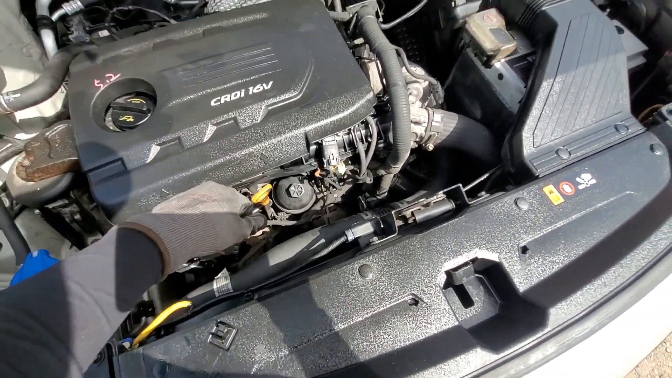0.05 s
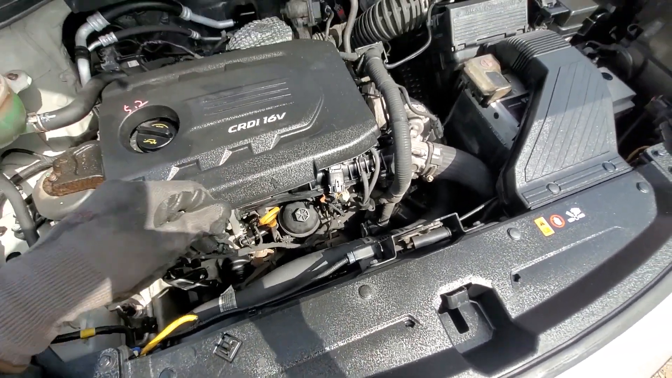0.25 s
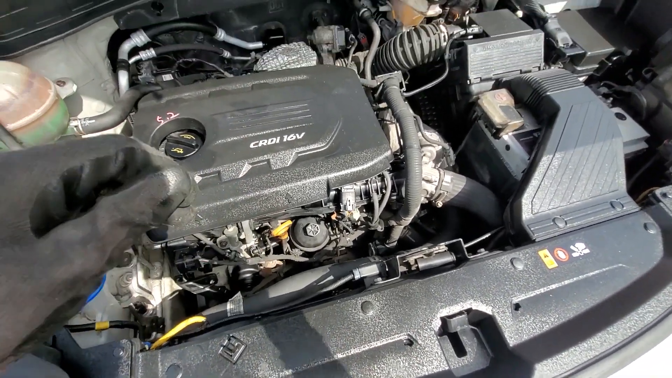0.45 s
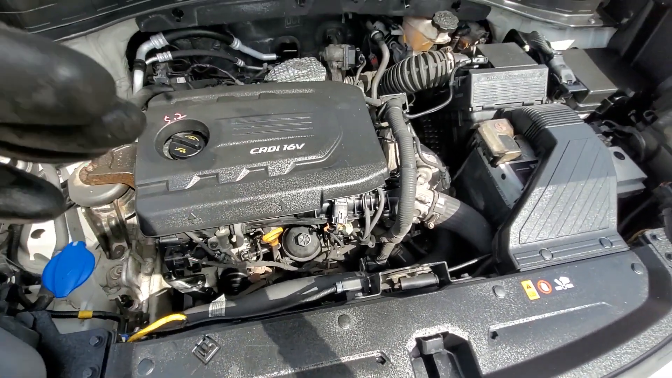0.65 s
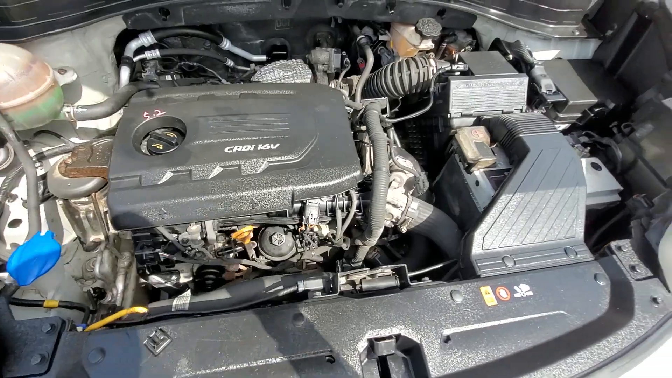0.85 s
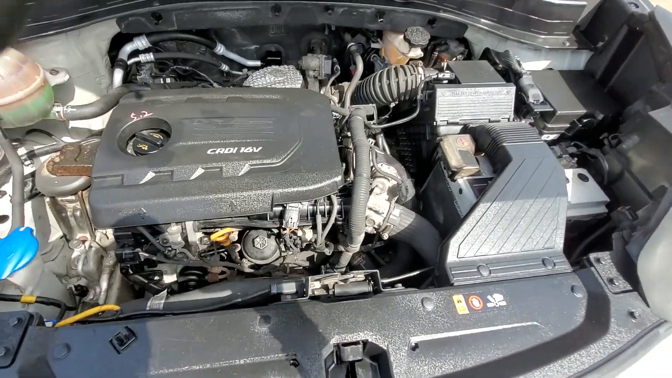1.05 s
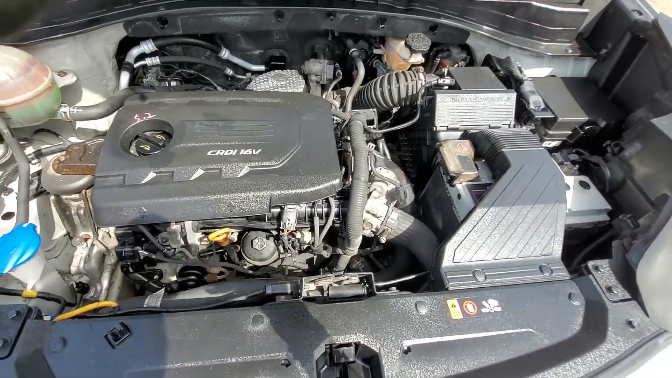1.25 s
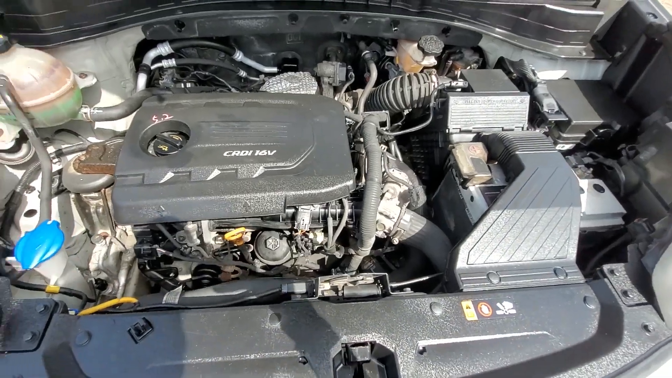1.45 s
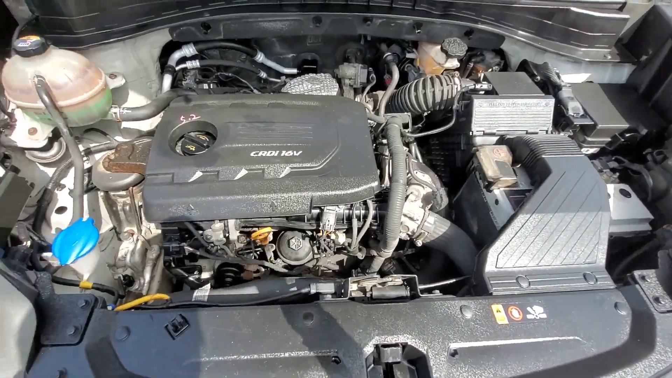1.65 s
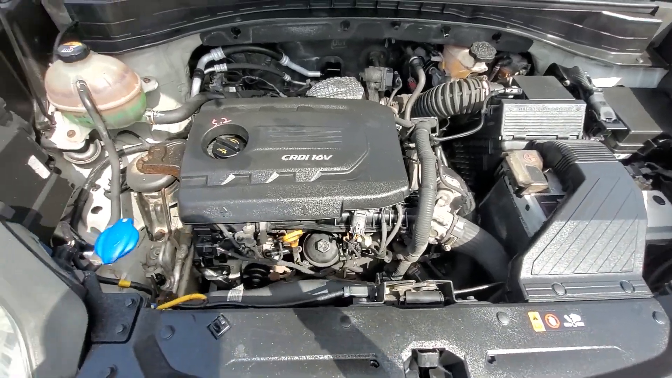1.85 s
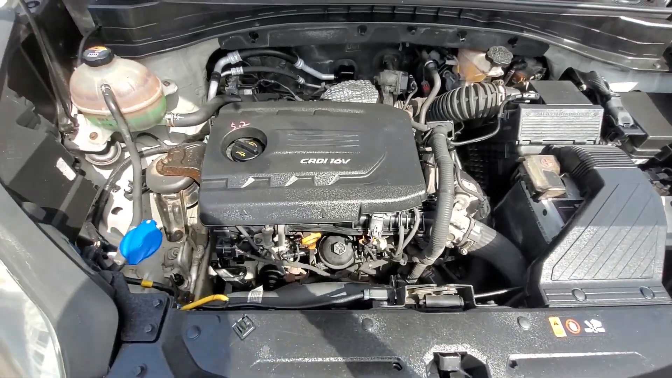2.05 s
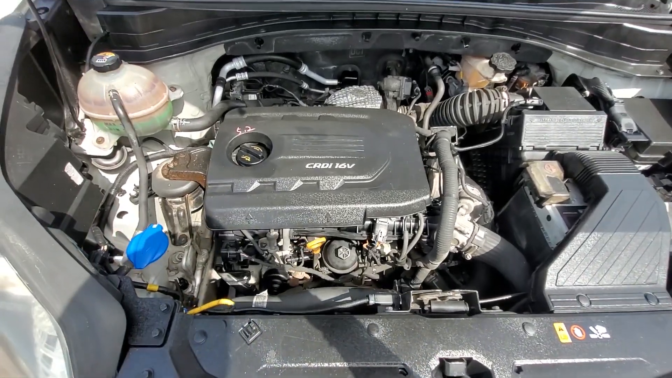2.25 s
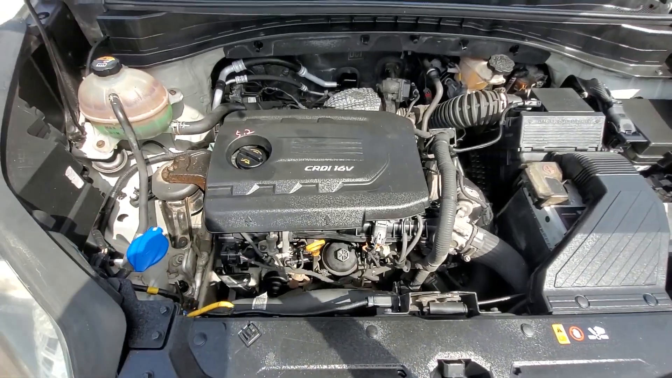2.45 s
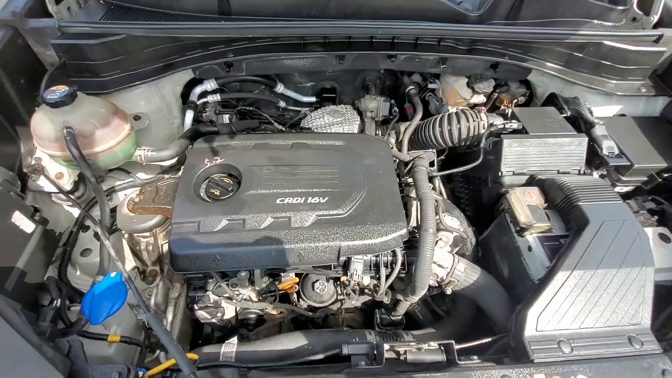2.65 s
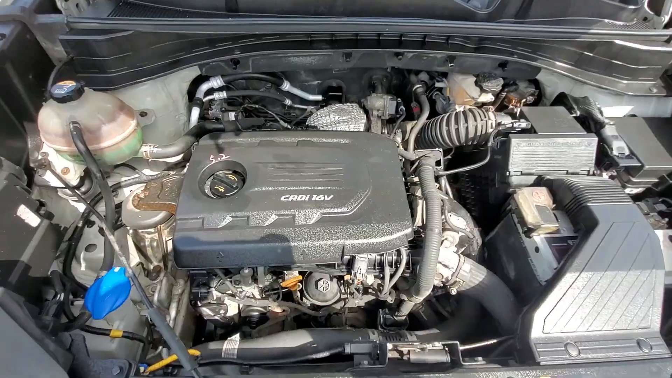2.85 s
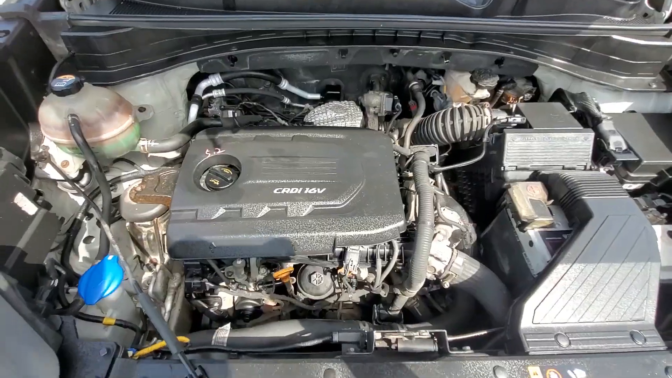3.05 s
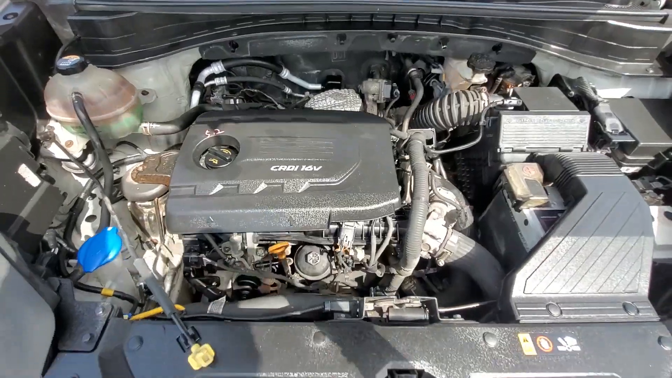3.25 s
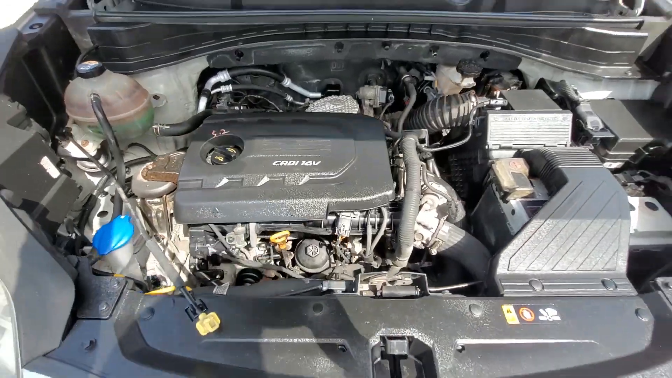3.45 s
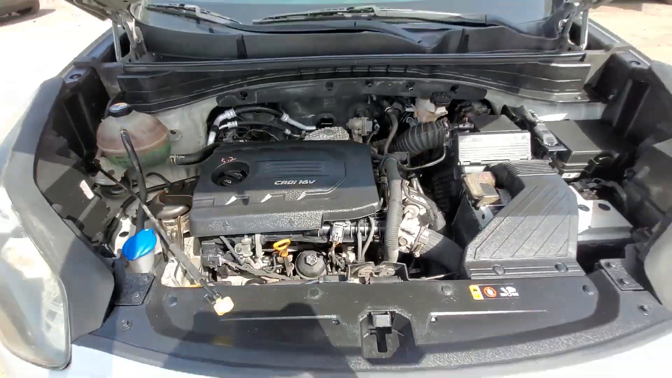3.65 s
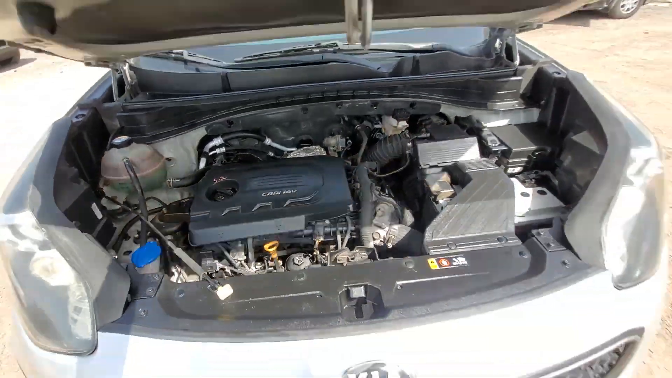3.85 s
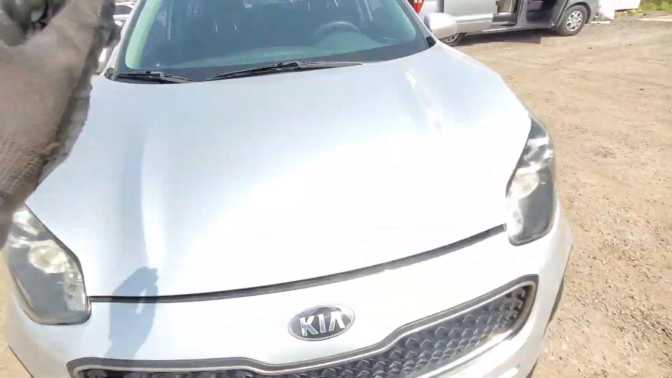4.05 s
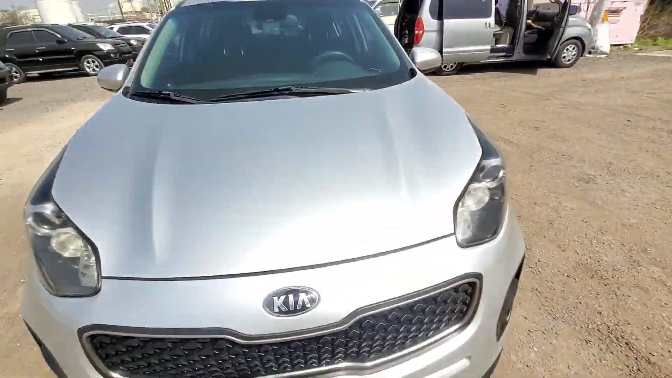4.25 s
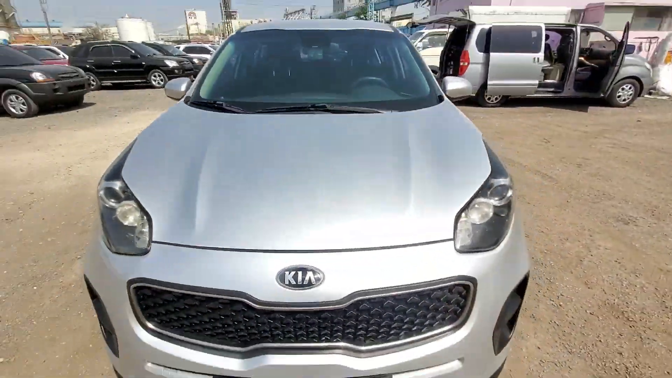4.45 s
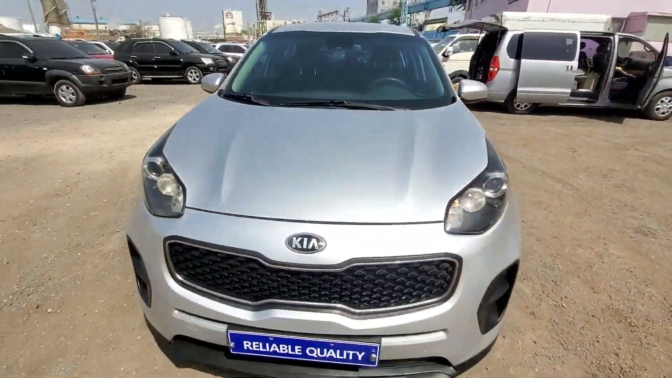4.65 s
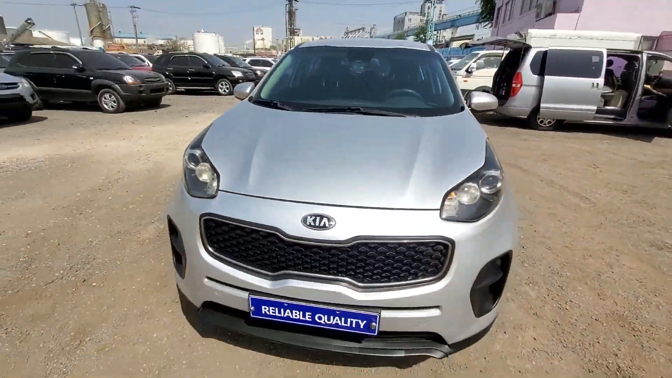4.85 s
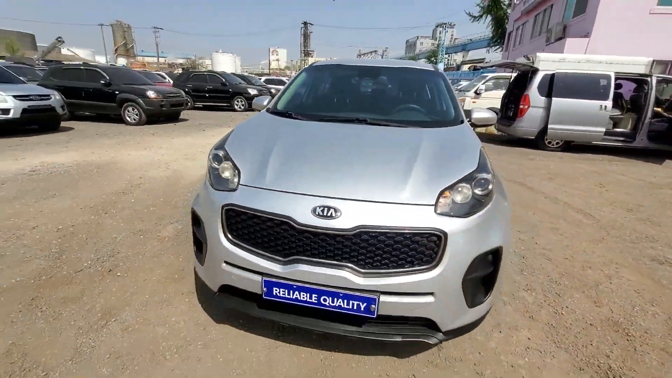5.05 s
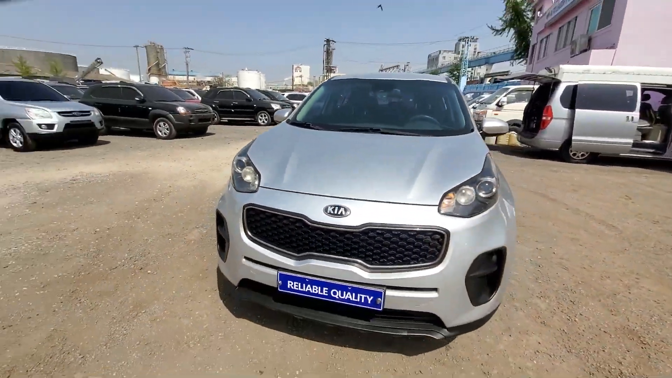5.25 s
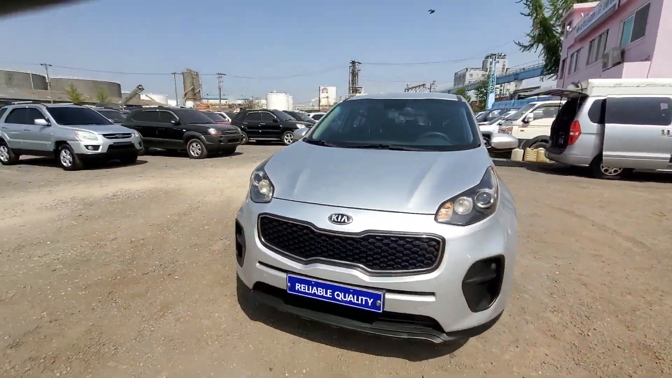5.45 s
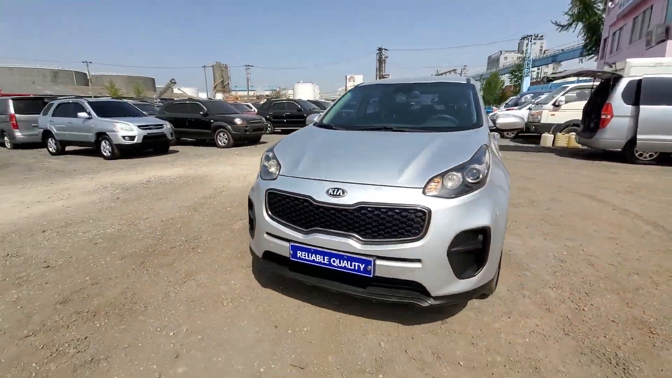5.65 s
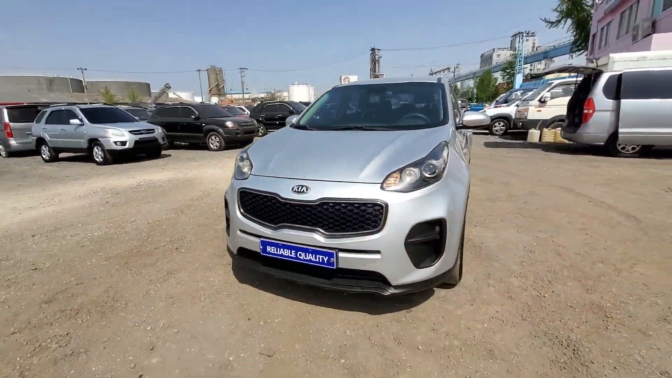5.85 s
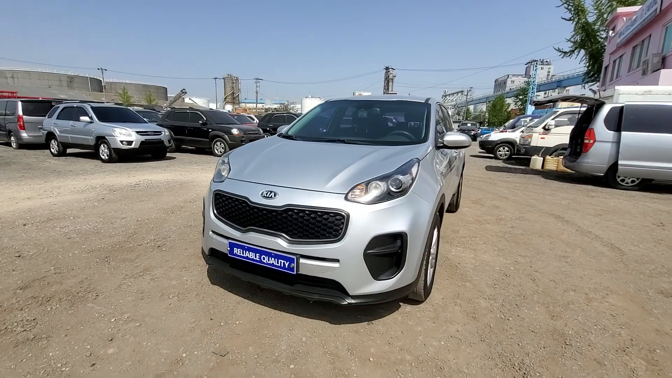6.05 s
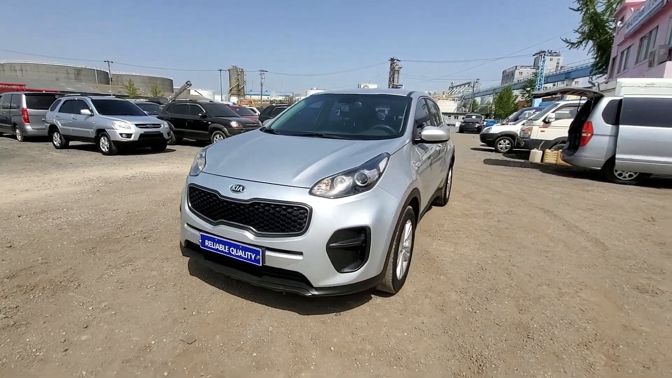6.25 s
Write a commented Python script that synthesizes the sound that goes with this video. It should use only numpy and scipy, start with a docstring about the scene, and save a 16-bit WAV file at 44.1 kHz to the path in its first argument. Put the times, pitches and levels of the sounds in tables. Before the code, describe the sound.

Outdoors, a handheld microphone hangs over an open engine bay: steady, rapid diesel knock, injector ticks, chain rattle and low throb. After three seconds it grows more distant and windy. A sharp, heavy bonnet slam follows at about four seconds. The whole sound sinks sharply, leaving muffled idling, then recovers, with stone snaps, gravel scuffs and low wind thuds, mostly on the right.

```python
"""A four-cylinder turbo-diesel idles in an open yard, heard from just above the engine bay.
Each firing gives a low throb (summed sines), a knock (sines of wandering pitch) and injector ticks (noise bursts),
over valve and chain clatter (repeating noise). The bonnet slams: struck panel tones, a latch crack and a boom.
The level sinks and swells back. Steps scrape and snap gravel (short noises), and wind buffets the
two microphone ports (low noise and single swings of pressure), with a faint wash of noise from the yard."""
import sys
import numpy as np
from scipy import signal
from scipy.fft import rfft, irfft, next_fast_len
from scipy.io import wavfile
from scipy.ndimage import uniform_filter1d

SR = 44100
rng = np.random.default_rng(int(sys.argv[2]) if len(sys.argv) > 2 else 0)


def materialize(psi):
    """Save the field psi as 16-bit PCM at rate SR to the path in sys.argv[1].

    A 1-D psi becomes a single channel; in a 2-D psi each row is a channel.
    """
    bounded = np.clip(np.atleast_2d(psi).T, -1, 1)
    quanta = np.round(bounded * 32767).astype(np.int16)
    wavfile.write(sys.argv[1], SR, quanta)


N = 278263
TIME = np.arange(N) / SR
FIRINGS_PER_S = 26.35  # idle speed before it settles
# the listener straightens up and backs off
BACK_OFF_S, BACK_OFF_TAKES_S = 3.155, 0.8


# how the engine differs between the ports: (frequency [Hz], left minus right [dB])
PORT_BALANCE = [(60, -2.5), (400, -2.5), (700, -3), (1400, 0.5), (2100, 0.5), (2800, 0.5), (4400, -9),
                (6300, -10.5), (9800, -2.5), (13000, -14.5), (16000, -12)]
# loss when the engine is fully hidden: (frequency [Hz], level [dB])
SCREEN_LOSS = [(75, -5.5), (130, -13), (175, -22), (240, -9.5), (340, -17.5), (450, -16), (700, -20.5),
               (1100, -17), (1700, -15), (2400, -16.5), (3000, -20.5), (3900, -21.5), (6000, -27),
               (9000, -20.5), (14000, -35.5)]


def engine(direct_loss_db=-5.0, lean_db=3.5, lean_s=1.4, port_lag_s=0.00014):
    """All engine sounds, duller and fainter as bodywork comes between; they reach the right port later."""
    crank, cover = crank_turn(), screening()
    turns = np.maximum.accumulate(crank)
    fired = np.interp(np.arange(int(crank[-1]) + 1), turns, TIME, left=-1)  # firing times [s]

    # these need a line of sight, so cover costs them extra
    sharp = knock(fired) + injectors(fired) + tappets(fired) + hum(crank)
    sharp = sharp * from_db(direct_loss_db * cover)
    # at first the listener leans low over the casings, so the clatter is louder
    lean = from_db(lean_db * (1 - ramp(0, lean_s)))
    pulsing = stroke(crank) * (lean * valve_train(crank) + rush() + hollow())
    bay = sharp + throb(crank) + pulsing

    # half the balance goes to each side
    left = shaped(bay[0], [(hz, db / 2) for hz, db in PORT_BALANCE])
    right = shaped(bay[1], [(hz, -db / 2) for hz, db in PORT_BALANCE])
    bay = np.array([left, np.interp(TIME - port_lag_s, TIME, right)])

    # blend between four fixed amounts of screening
    steps = np.linspace(0, 1, 4)
    out = np.zeros((2, N))
    for step in steps:
        share = np.interp(cover, steps, steps == step)
        out += share * shaped(bay, [(hz, step * db) for hz, db in SCREEN_LOSS])
    return out


# the beat jumps back once: (time [s], jump back [firings])
BEAT_JUMP = (2.97, .53)
# the idle settles lower: (from time [s], speed drop [firings per s])
IDLE_SETTLES = (3.4, .105)


def crank_turn(start_phase=0.72):
    """Place in the beat, in firings: a steady count that jumps back at one moment, later a bit slower."""
    jump_s, jump_back = BEAT_JUMP
    settle_s, slower = IDLE_SETTLES
    steady = start_phase + FIRINGS_PER_S * TIME
    return steady - jump_back * (TIME > jump_s) - slower * np.maximum(TIME - settle_s, 0)


# low tones of the firing pulse: (multiple of the firing rate, level [dB rms])
THROB_TONES = [(1.5, -51), (2, -35.5), (2.5, -45), (3, -25.5), (4, -30.3), (4.5, -47), (5, -42), (6, -45)]


def throb(crank, waver_db=0.15, top_hz=400, lag=0.72):
    """Firing pushes out low tones; those at whole multiples dip together, lag beats after each firing."""
    pulse = np.zeros(N)
    for multiple, db in THROB_TONES:
        level = from_db(db + waver_db * drift(12.0))
        pulse -= np.sqrt(2) * level * np.cos(2 * np.pi * multiple * (crank - lag))
    return signal.sosfiltfilt(signal.butter(2, top_hz, fs=SR, output="sos"), pulse)


# ring of the block and fuel lines:
# (frequency [Hz], width [Hz], relative level for cylinders 1, 2, 3 and 4 [dB each])
KNOCK_RINGS = [(1240, 45, -32, -28, -27, -30), (1480, 35, -24.5, -20, -18, -18),
               (1680, 55, -25, -26, -24, -21.5), (1900, 45, -24.5, -23.5, -27.5, -22),
               (2080, 45, -27, -20, -28, -26), (2300, 70, -27, -29, -32, -28),
               (3500, 130, -37, -40, -32, -37), (4750, 180, -35, -32, -29, -28),
               (6230, 85, -31, -24, -26, -27), (6700, 400, -35, -30, -30, -31),
               (9000, 1800, -50, -46, -39, -37), (14250, 200, -39, -41, -36, -33),
               (15200, 700, -37, -39, -34, -32)]


def knock(fired, delay=0.0014, uneven_db=1.14, level_db=-4.5, fresh=0.56, mode_swing_db=1.33,
          t60_s=0.052, rise_s=0.0007):
    """Each combustion rings the block briefly; each cylinder's own ring comes back nearly alike."""
    count = len(fired)
    cylinder = np.arange(count) % 4
    force_db = level_db + uneven_db * rng.standard_normal(count)
    soft = np.exp(-1 / (rise_s * SR))
    # for every sample: which knock came last, and how many samples ago
    starts = np.maximum(np.round((fired + delay) * SR).astype(int), 0)
    latest = np.maximum(np.searchsorted(starts, np.arange(N), "right") - 1, 0)
    age = np.minimum(np.arange(N) - starts[latest], 2047)

    out = np.zeros((2, N))
    for hz, width, *by_cylinder in KNOCK_RINGS:
        swing_db = mode_swing_db * rng.standard_normal(count)
        strength = from_db(np.array(by_cylinder)[cylinder] + force_db + swing_db)
        decay = dying(clicks(fired + delay, strength), t60_s)
        envelope = signal.lfilter([1 - soft], [1, -soft], decay)
        # a cluster of close modes: the phase wanders, mostly along the cylinder's own path
        own_steps = rng.standard_normal((2, 4, 2048))[:, cylinder]
        steps = own_steps + fresh * rng.standard_normal((2, count, 2048))
        smooth_steps = signal.lfilter([.05], [1, -.95], steps)
        wander = np.cumsum(smooth_steps, axis=2) * np.sqrt(2 * np.pi * width / SR)
        wander += rng.uniform(0, 2 * np.pi, (2, 4, 1))[:, cylinder]
        phase = 2 * np.pi * hz * age / SR + wander[:, latest, age]
        out += np.sqrt(2) * envelope * np.sin(phase)
    return out


# colour of an injector tick: (frequency [Hz], level [dB per Hz])
TICK_COLOUR = [(500, 53), (1500, -51), (2800, 4), (4500, 2), (6500, -12), (9500, -11), (12500, -13.5),
               (15500, -22.5)]
# loudness of the injectors of cylinders 1, 2, 3 and 4: (level [dB] each)
INJECTOR_LEVELS = [1, -3.5, 0, 1.5]


def injectors(fired, level_db=-33.5, main_delay=0.003, pilot_db=-2, t60=0.094, uneven_db=-0.5):
    """A pilot and a main injection tick on every firing, each a dying burst of noise."""
    own_db = np.resize(INJECTOR_LEVELS, len(fired))[:, None]
    strength = from_db(own_db + uneven_db * rng.uniform(-0.78, 1, (len(fired), 2)))
    pilot = clicks(fired, strength[:, 0] * from_db(pilot_db))
    main = clicks(fired + main_delay, strength[:, 1])
    return from_db(level_db) * rms_one(dying(pilot + main, t60) * noise(TICK_COLOUR))


# ring of the casings under valve and gear contacts: (frequency [Hz], level [dB per Hz])
CASING_COLOUR = [(100, 6), (180, 0.5), (245, -2), (290, -3), (340, 0.5), (400, -7.5), (450, -7.5), (500, 5),
                 (570, -12), (660, 0), (730, -14), (830, 3.5), (1150, -3), (2000, -7), (3000, -10.5),
                 (6000, -22), (10000, -31)]


def valve_train(crank, level_db=-30, rough=0.45):
    """Cams, gears and chain repeat the same dense contacts every four firings, never quite as hard."""
    size = round(4 * SR / FIRINGS_PER_S)
    cycle = rng.standard_normal((2, size))
    place = (crank % 4 / 4 * size).astype(int) % size
    contacts = cycle[:, place] * (1 + rough * drift(150))
    return from_db(level_db) * rms_one(shaped(two_ports(contacts), CASING_COLOUR))


# ring of the tappets: (frequency [Hz], relative level [dB])
TAPPET_RINGS = [(3480, 2.5), (4010, 1), (4850, -7), (5900, 3.5), (7900, -2)]


def tappets(fired, level_db=-39, t60=.024, uneven_db=7.0):
    """Valves seat with small uneven metallic ticks between the knocks."""
    chance = rng.uniform(-1, 1, (len(fired), 2))
    # two seatings a firing, at about 0.4 and 0.62 of the way to the next
    seats = (fired[:, None] + (np.array([.4, .62]) + .05 * chance) / FIRINGS_PER_S).ravel()
    shape = (2, len(TAPPET_RINGS), len(seats))
    strength = rng.choice([-1, 1], shape) * from_db(uneven_db * rng.uniform(-2.8, 1, shape))
    sides = np.zeros((2, N))
    for side in range(2):
        for (hz, db), gains in zip(TAPPET_RINGS, strength[side]):
            sides[side] += from_db(db) * ring(clicks(seats, gains), hz, t60)
    return from_db(level_db) * rms_one(sides)


# rush of belts, chain and air: (frequency [Hz], level [dB per Hz])
RUSH_COLOUR = [(22, -36), (40, -6), (60, -2.5), (110, 1), (170, -8.5), (260, -2), (350, -7.5), (560, -9),
               (1000, -9), (1500, -10.5), (2300, -10.5), (2900, -15), (6300, -19), (9500, -31),
               (13000, -28.5)]


def rush(level_db=-25.0, flutter_db=2.0):
    """Belts, chain and intake air make a broad, fluttering rush of noise."""
    return bay_echoes(from_db(level_db + flutter_db * drift(250)) * noise(RUSH_COLOUR))


def bay_echoes(x, echo_db=-16, low_hz=1200):
    """Nearby panels and pipes throw the treble back within milliseconds and ripple its spectrum."""
    treble = filtered(x, 2, "high", low_hz)
    lags = (rng.uniform(.002, .008, 4) * SR).astype(int)
    echoes = sum((-1) ** k * np.roll(treble, lag, axis=1) for k, lag in enumerate(lags))
    return x + from_db(echo_db) * echoes


# steady hum of the drive train: (multiple of the firing rate, level [dB rms])
HUM_TONES = [(5.5, -48), (6, -48), (7.5, -45), (9.25, -41), (9.5, -46), (11, -43), (15, -39), (17, -47),
             (19, -44.5), (21, -48), (31.5, -49), (152.1, -56)]


def hum(crank, waver_db=2.5, wobble=0.54):
    """Pulleys, pump and alternator sing at fixed multiples of the crank's speed."""
    out = np.zeros(N)
    for multiple, db in HUM_TONES:
        level = from_db(db + waver_db * drift(12))
        out += np.sqrt(2) * level * np.sin(2 * np.pi * multiple * crank + wobble * drift(5.7))
    return out


# colour of the air in the engine bay: (frequency [Hz], level [dB per Hz])
HOLLOW_COLOUR = [(120, -57), (215, 11), (300, 6.5), (520, -5.5), (660, 8.5), (800, 2), (1500, -27)]


def hollow(start_s=2.87, takes_s=0.11, near_db=-40.5, far_db=-28):
    """The bay's air booms in broad resonances, more once the listener is no longer bent over it."""
    return from_db(near_db + (far_db - near_db) * ramp(start_s, takes_s)) * noise(HOLLOW_COLOUR)


def stroke(crank, depth_db=1, crest=0.29):
    """Gain that swells with each power stroke; the crest is a share of a firing."""
    return from_db(depth_db * np.cos(2 * np.pi * (crank - crest)))


def screening(rim_cover=0.29, drop_s=3.997, drop_takes_s=0.24,
              grille_s=4.27, grille_takes_s=0.69, grille_share=0.35):
    """Share of the engine hidden by the bay's rim, then the falling bonnet, less what the grille lets out."""
    rim = rim_cover * ramp(BACK_OFF_S, BACK_OFF_TAKES_S)
    bonnet = (1 - rim_cover) * ramp(drop_s, drop_takes_s)
    return np.clip(rim + bonnet - grille_share * ramp(grille_s, grille_takes_s), 0, 1)


# bonnet strikes the latch, then drives it home: (time [s], panel level [dB], latch crack level [dB])
LATCH_BLOWS = [(4.1214, 0, -13), (4.1279, -2, -37)]
# bonnet bounces on its rubber stops: (time [s], panel level [dB], clack level [dB])
STOP_BUMPS = [(4.164, -11.5, -15.5), (4.181, -12.5, -18.5), (4.205, -10, -37)]
# tones of the panel: (frequency [Hz], level when struck at the latch [dB],
# level when struck at the stops [dB], time to die away by 60 dB [s])
PANEL_TONES = [(106, -21, -16, 0.42), (247, -17, -12.5, 0.74), (277, -3, -15, 0.059), (327, -21, -14, 0.42),
               (486, -30, -28, 0.17), (635, -27, -13, 0.2), (763, -35, -13.5, 0.26), (910, -36, -26, 0.21),
               (1020, -37, -27, 0.34), (1150, -27, -30, .08), (1300, -36, -24, 0.16), (1605, -25, -32, 0.1),
               (2100, -40, -38, 0.17)]
# dense shudder of the sheet metal: (frequency [Hz], level [dB per Hz])
SHUDDER_COLOUR = [(25, -28), (60, -12), (130, -2), (280, 8.5), (450, 0), (700, -2), (1200, -11.5),
                  (1800, -34), (3000, -45), (9000, -64)]
# crack of the latch: (frequency [Hz], level [dB per Hz])
CRACK_COLOUR = [(200, 11.5), (900, 9.5), (2500, -4.5), (4200, -6.5), (7000, -7.5), (10000, -16.5),
                (15000, -8)]


def slam(crack_t60=0.088, stop_top_hz=2600, shudder_db=-20, shudder_t60=1.0, panel_db=-2,
         boom_db=-7.5, boom_hz=62, boom_t60=0.35, latch_db=-11, low_hz=35):
    """The latch cracks and pings, the panel thuds and shudders, then clangs on its stops with a boom."""
    blow_s, blow_db, crack_db = np.transpose(LATCH_BLOWS)
    stop_s, stop_db, clack_db = np.transpose(STOP_BUMPS)
    blows, bumps = clicks(blow_s, from_db(blow_db)), clicks(stop_s, from_db(stop_db))

    panel = np.zeros(N)
    for hz, front_db, edge_db, t60 in PANEL_TONES:
        panel += ring(from_db(front_db) * blows + from_db(edge_db) * bumps, hz, t60)
    panel *= from_db(panel_db)
    latch = from_db(latch_db) * ring(clicks(blow_s[:1], [1.0]), hz=4100, t60=0.0091)
    boom = from_db(boom_db) * ring(clicks([4.1445], [1.0]), boom_hz, boom_t60)

    # the hits add as energy, which dies in half the time
    energy = dying(blows ** 2 + bumps ** 2, shudder_t60 / 2)
    shudder = from_db(shudder_db) * np.sqrt(energy) * noise(SHUDDER_COLOUR)
    grit = noise(CRACK_COLOUR)
    crack = dying(clicks(blow_s, from_db(crack_db)), crack_t60) * grit
    clacks = dying(clicks(stop_s, from_db(clack_db)), crack_t60) * grit
    clacks = filtered(clacks, 2, "low", stop_top_hz)
    radiated = filtered(panel + latch + boom + shudder + crack + clacks, 2, "high", low_hz)
    return radiated * from_db([[-1.5], [1.0]])


# shoes scuffing gravel: (time [s], level [dB], half-length [s])
SHOE_SCUFFS = [(5.066, -35.5, 0.056), (5.24, -31.5, 0.044), (5.911, -31.5, 0.018), (6.264, -40, 0.0093)]
# colour of the gravel: (frequency [Hz], level [dB per Hz])
GRAVEL_COLOUR = [(800, -4), (2900, 1.5), (3900, 6.5), (4800, 0), (7500, -1), (10000, -16), (13000, -4),
                 (16000, -15)]
# small stones snapping underfoot: (time [s], level [dB])
STONE_SNAPS = [(4.741, -29), (5.002, -14), (5.0318, -17)]
# one stone squeaks: (time [s], level [dB], half-length [s], frequency [Hz])
STONE_SQUEAK = (5.92, -28, 0.02, 4016)
# a heel crunching into the dirt: (time [s], level [dB], half-length [s])
HEEL_CRUNCHES = [(6.126, -27.5, 0.018), (6.179, -25, 0.0077)]
# colour of the dirt: (frequency [Hz], level [dB per Hz])
DIRT_COLOUR = [(200, -17), (600, 1), (1400, -4), (2500, -14), (6000, -45)]


def footsteps(grain_db=2.5, left_db=-11, snap_t60=0.0095):
    """Soles grind and snap small stones, one of which squeaks; the heel gives a duller crunch."""
    grains = rms_one(from_db(grain_db * drift(700)))
    scuffs = grains * sum(swell(*row) for row in SHOE_SCUFFS) * noise(GRAVEL_COLOUR)
    *squeak_shape, squeak_hz = STONE_SQUEAK
    squeak = swell(*squeak_shape) * np.sin(2 * np.pi * squeak_hz * TIME)
    snap_s, snap_db = np.transpose(STONE_SNAPS)
    soft_noise = signal.lfilter([.5], [1, -.5], rng.standard_normal((2, N)))
    snaps = dying(clicks(snap_s, from_db(snap_db)), snap_t60) * soft_noise
    crunches = grains * sum(swell(*row) for row in HEEL_CRUNCHES) * noise(DIRT_COLOUR)
    return (scuffs + squeak + snaps) * from_db([[left_db], [0]]) + crunches


# strong buffets: (time [s], level [dB], half-length [s], top frequency [Hz])
WIND_GUSTS = [(1.279, -14.5, 0.023, 400), (3.415, -14, 0.013, 355), (3.757, -16.5, 0.013, 240),
              (3.977, -21, 0.039, 300), (4.39, -17.5, 0.089, 190), (4.626, -19.5, 0.017, 330),
              (4.774, -16.5, 0.041, 230), (5.364, -14.5, 0.0078, 250), (5.525, -16.5, 0.034, 230),
              (5.865, -20.5, 0.04, 202), (6.165, -15, 0.04, 171), (6.24, -18, 0.018, 200)]
# single eddies popping on the port: (time [s], strength [dB], half-length [s])
WIND_POPS = [(1.273, -6, 0.0012), (1.289, -14, 0.0015), (1.506, -3, 0.002), (3.42, 1.5, 0.0011),
             (3.4625, -8, .0011), (3.472, -2, .0022), (3.744, -12, .0016), (3.752, -2.5, 0.0018),
             (3.944, -5, 0.0019), (3.955, -6, 0.0014), (3.99, -4, .001), (3.995, -8, 0.00075),
             (4.6053, -5, 0.0011), (4.629, -5, 0.00086), (4.7435, -9, 0.00059), (4.7952, 0, 0.00069),
             (5.507, -4.5, 0.0011), (5.547, 1, .0021), (5.574, -7.5, 0.002), (5.761, -6.5, 0.0041),
             (5.813, -10, 0.0017), (5.862, -9, 0.0017), (6.143, -4.5, 0.0013), (6.161, -2, 0.0019),
             (6.238, 1, 0.0011), (6.26, -7, 0.0018), (6.293, -4, 0.002)]


def wind(left_db=-20, low_hz=70, eddy_db=-39, eddy_swing_db=11.5, eddies_per_s=6.2):
    """Eddies burst mostly on the right port; some pop with one swing of pressure, down then up."""
    air = filtered(rng.standard_normal((2, N)), 2, "high", low_hz)
    # small eddies come at random while walking
    level_db = eddy_db + eddy_swing_db * np.minimum(drift(eddies_per_s), 2)
    out = ramp(BACK_OFF_S, BACK_OFF_TAKES_S) * from_db(level_db) * rumble(air, top_hz=190)
    for s, db, half, top_hz in WIND_GUSTS:
        near = np.abs(TIME - s) < .25
        out[:, near] += swell(s, db, half)[near] * rumble(air[:, near], top_hz)
    for s, db, half in WIND_POPS:
        near = np.abs(TIME - s) < .05
        u = (TIME[near] - s) / half
        out[:, near] += from_db(db) * 2 * u / (1 + u ** 2) ** 2
    return out * from_db([[left_db], [0]])


def rumble(air, top_hz):
    """Noise with its treble removed, evened out to about rms 1."""
    low = filtered(air, 3, "low", top_hz)
    return low / np.sqrt(uniform_filter1d(low ** 2, size=1500) + 1e-12)


# colour of the moving air: (frequency [Hz], level [dB per Hz])
BREEZE_COLOUR = [(18, -35), (35, -21), (58, 7), (90, -11), (130, -6), (220, -25), (600, -89)]


def breeze(swing_db=2.5, left_db=-5, standing_db=-30, walking_db=-25):
    """Moving air rumbles on each port by itself, more on the right and more when walking."""
    walking = ramp(BACK_OFF_S, BACK_OFF_TAKES_S)
    level_db = standing_db + (walking_db - standing_db) * walking + swing_db * drift(3.93)
    air = rms_one(shaped(rng.standard_normal((2, N)), BREEZE_COLOUR))
    return air * from_db(level_db) * from_db([[left_db], [1]])


# diffuse wash of the yard: (frequency [Hz], level [dB per Hz])
YARD_COLOUR = [(25, -4), (55, 28.5), (120, 3), (250, -10), (450, -3), (1100, -28), (2000, -22), (2400, 12),
               (2800, -42), (3900, -30), (7500, -47), (10000, -92), (16000, -28)]


def yard(level_db=-44):
    """The open yard adds a faint, steady wash of coloured noise."""
    return from_db(level_db) * noise(YARD_COLOUR)


def sinking(sink_s=4.147, takes_s=0.19, sink_db=-15, sag_db_per_s=-5.0,
            recover_s=5.346, recover_time_s=0.25):
    """Gain of the whole sound: it sinks after the slam, sags for about a second and swells back."""
    sag_db = sag_db_per_s * (np.clip(TIME, sink_s, recover_s) - sink_s)
    held_db = sink_db * ramp(sink_s, takes_s) + sag_db
    return from_db(held_db * np.exp(-np.maximum(TIME - recover_s, 0) / recover_time_s))


def from_db(db):
    """Decibels to gain."""
    return 10 ** (np.asarray(db) / 20)


def rms_one(x):
    """Scale to unit rms (average strength)."""
    return x / np.sqrt(np.mean(x ** 2) + 1e-20)


def filtered(x, order, kind, hz):
    """Keep only what lies below ("low") or above ("high") a frequency."""
    return signal.sosfilt(signal.butter(order, hz, kind, fs=SR, output="sos"), x)


def shaped(x, spectrum):
    """Colour a signal by a table of (frequency [Hz], level [dB]), read on a log-frequency axis."""
    size = next_fast_len(N + 4096)
    hz = np.maximum(np.arange(size // 2 + 1) * SR / size, 1)
    table_hz, table_db = np.transpose(spectrum)
    gain = from_db(np.interp(np.log(hz), np.log(table_hz), table_db))
    return irfft(rfft(x, size) * gain, size)[..., :N]


# how alike left and right are: (frequency [Hz], likeness from 0 to 1)
PORT_LIKENESS = [(40, 0.039), (120, 1), (300, 0.95), (600, 0.92), (1100, 0.31), (16000, 0.025)]


def two_ports(pair):
    """Mix two unrelated signals into left and right, most alike from about 100 to 600 Hz."""
    alike = [(hz, np.clip(c, -.98, .98)) for hz, c in PORT_LIKENESS]
    mid = shaped(pair[0], [(hz, 10 * np.log10(1 + c)) for hz, c in alike])
    side = shaped(pair[1], [(hz, 10 * np.log10(1 - c)) for hz, c in alike])
    return np.array([mid + side, mid - side])


def noise(spectrum):
    """Coloured stereo noise, rms 1."""
    return rms_one(shaped(two_ports(rng.standard_normal((2, N))), spectrum))


def drift(rate):
    """Random values, rate per second, joined by straight lines."""
    return np.interp(TIME * rate, np.arange(8192), rng.standard_normal(8192))


def ramp(start, takes):
    """A steady move from 0 to 1."""
    return np.clip((TIME - start) / takes, 0, 1)


def swell(s, db, half):
    """A bell-shaped rise and fall of level."""
    out, near = np.zeros(N), np.abs(TIME - s) < 6 * half
    out[near] = from_db(db) * np.exp(-.5 * ((TIME[near] - s) / half) ** 2)
    return out


def clicks(times, gains):
    """One impulse at each time."""
    at = np.round(np.asarray(times) * SR).astype(int)
    inside = (at >= 0) & (at < N)
    return np.bincount(at[inside], np.asarray(gains)[inside], N)


def ring(hits, hz, t60):
    """Each click starts a sine of about its own height, which dies by 60 dB in t60 seconds."""
    r, w = from_db(-60 / (t60 * SR)), 2 * np.pi * hz / SR
    return signal.lfilter([0, np.sin(w)], [1, -2 * r * np.cos(w), r * r], hits + 1e-18)


def dying(hits, t60):
    """Envelope that jumps at each click and dies by 60 dB in t60 seconds."""
    return signal.lfilter([1], [1, -from_db(-60 / (t60 * SR))], hits + 1e-18)


def scene():
    """Engine, bonnet, feet and wind in the open yard."""
    air = wind() + breeze() + yard()
    return (engine() + slam() + footsteps() + air) * sinking()


def record(dry, cutoff_hz=15900):
    """Peaks are clipped at full scale, then the top treble is cut."""
    lowpass = signal.firwin(601, cutoff_hz, window=("kaiser", 9), fs=SR)
    return signal.fftconvolve(np.clip(dry, -1, 1), lowpass[None], "same", axes=1)


dry = scene()
out = record(dry)
materialize(out)
```